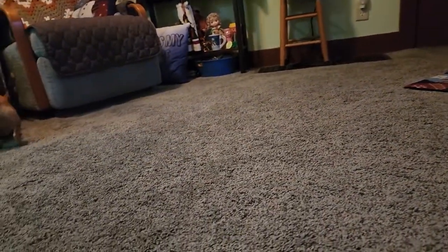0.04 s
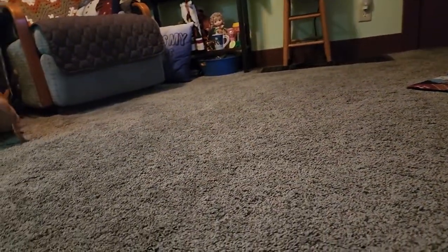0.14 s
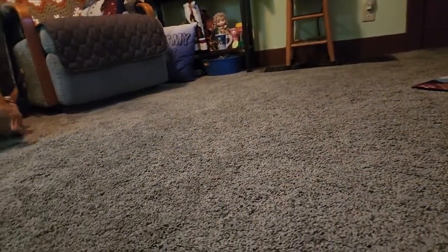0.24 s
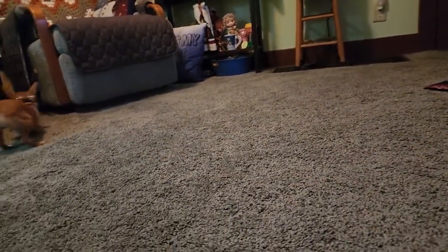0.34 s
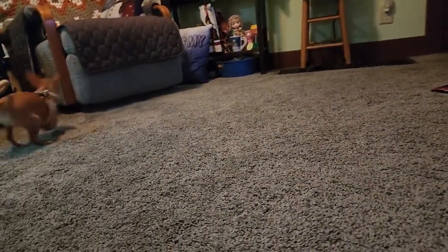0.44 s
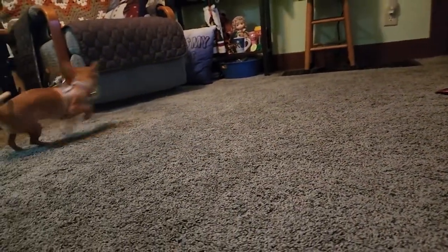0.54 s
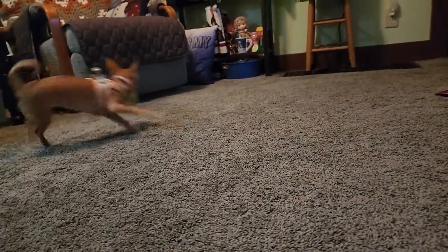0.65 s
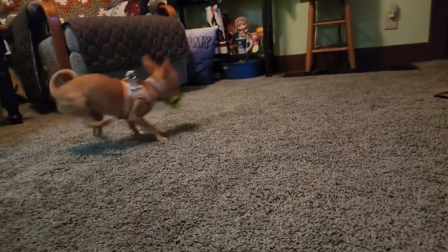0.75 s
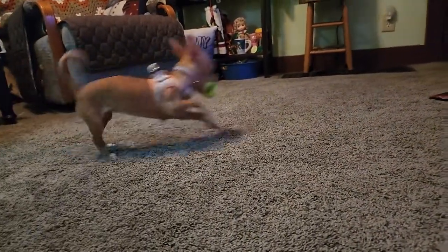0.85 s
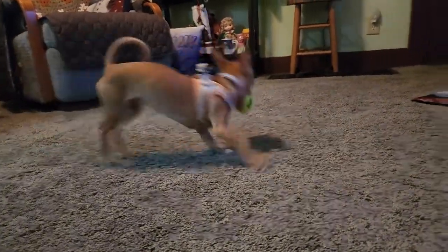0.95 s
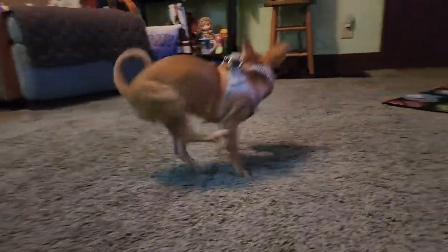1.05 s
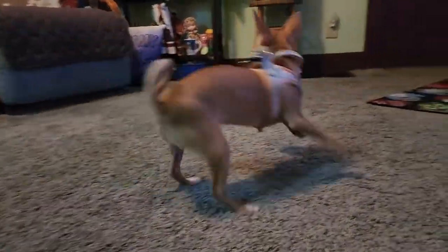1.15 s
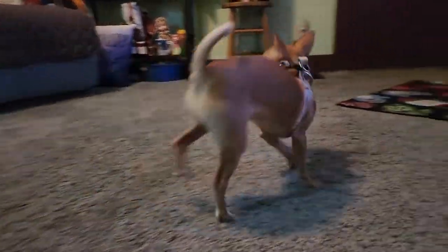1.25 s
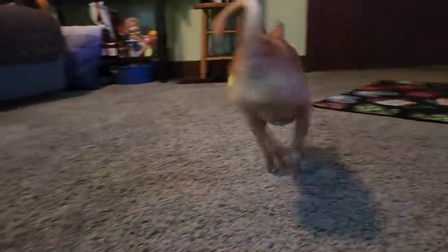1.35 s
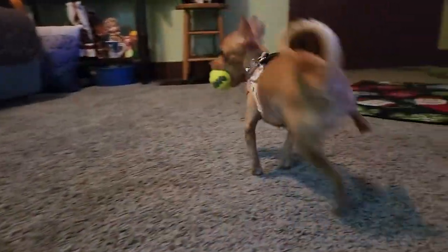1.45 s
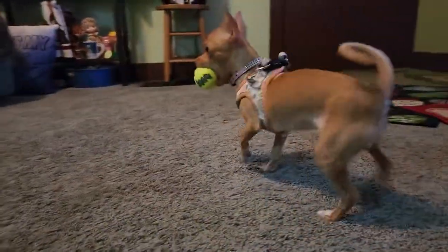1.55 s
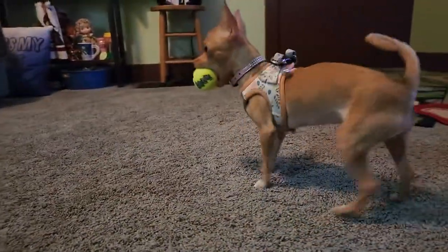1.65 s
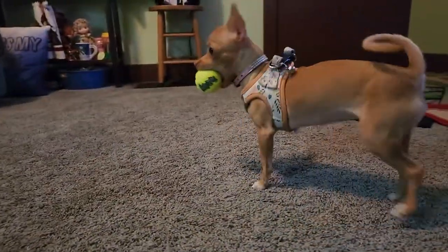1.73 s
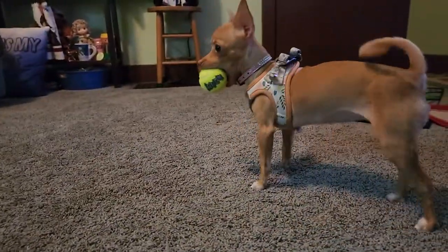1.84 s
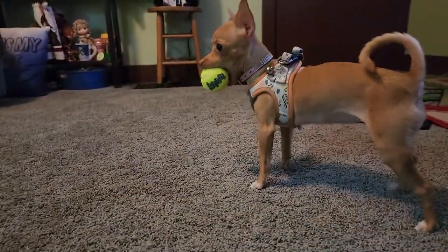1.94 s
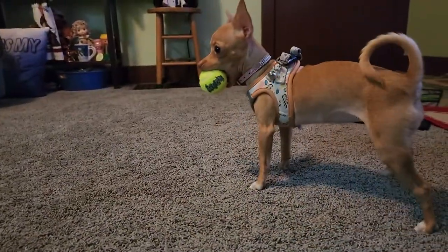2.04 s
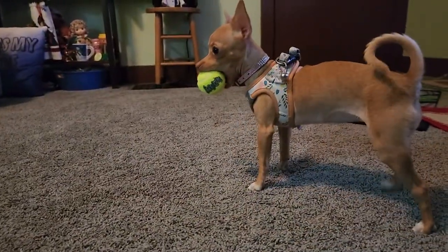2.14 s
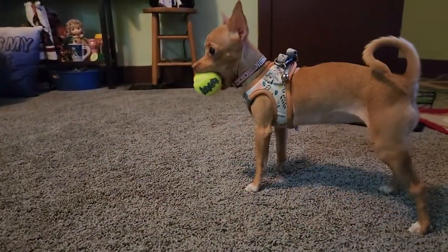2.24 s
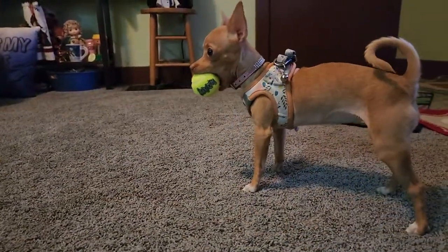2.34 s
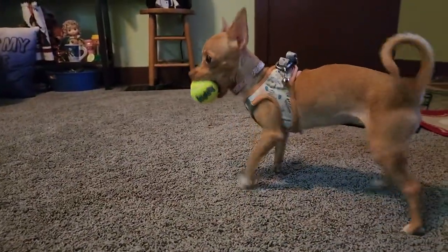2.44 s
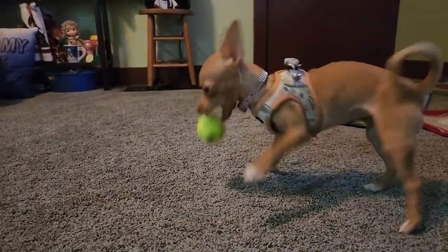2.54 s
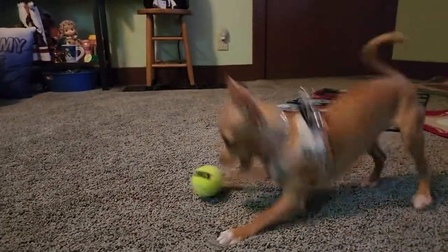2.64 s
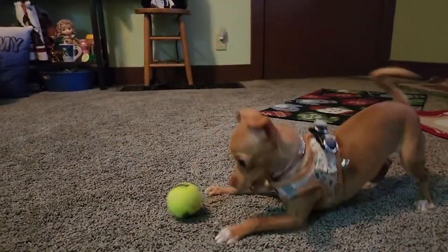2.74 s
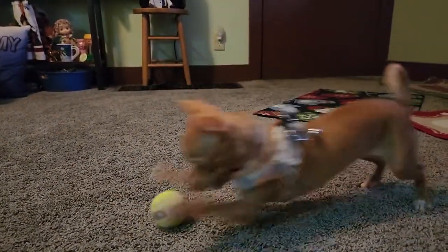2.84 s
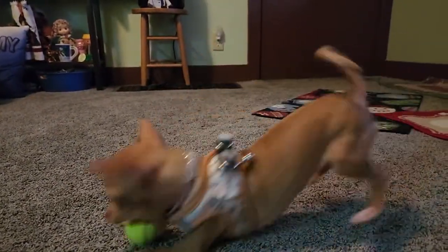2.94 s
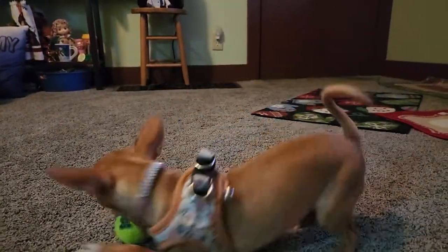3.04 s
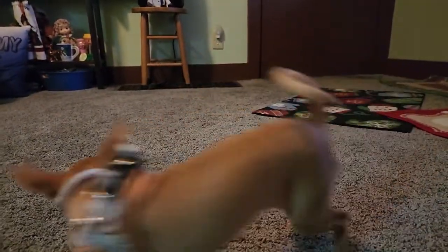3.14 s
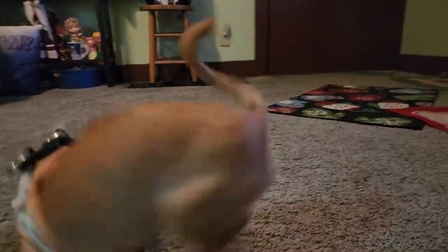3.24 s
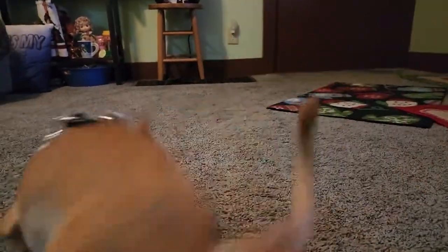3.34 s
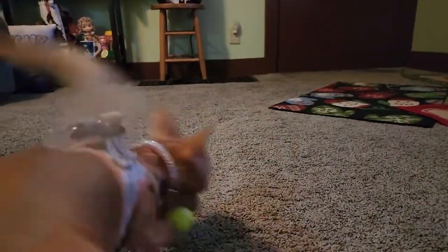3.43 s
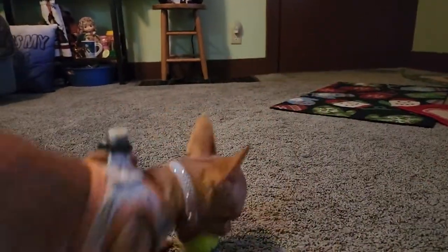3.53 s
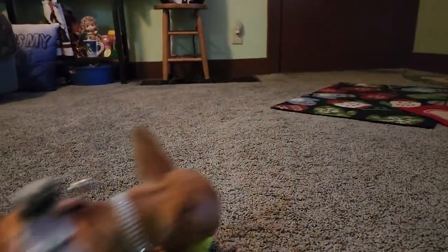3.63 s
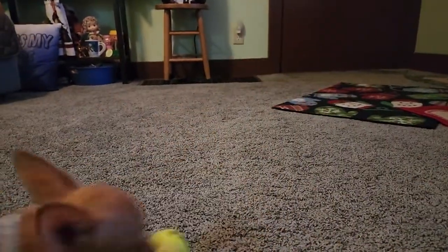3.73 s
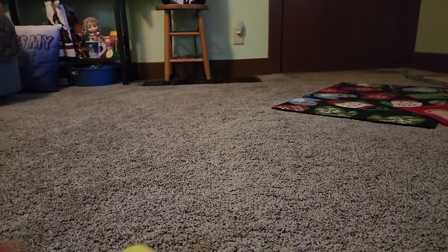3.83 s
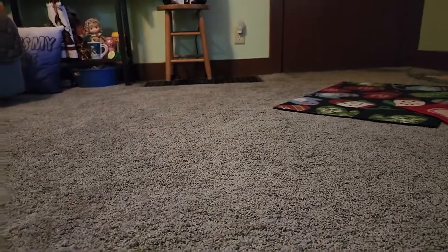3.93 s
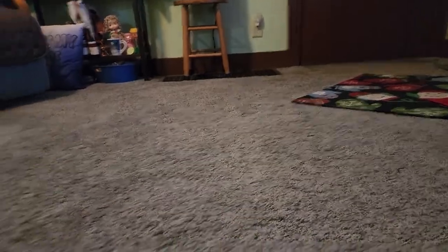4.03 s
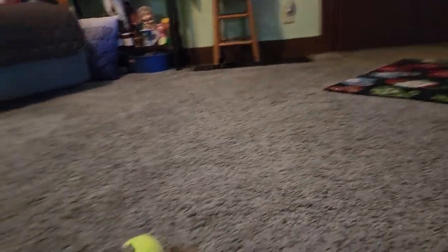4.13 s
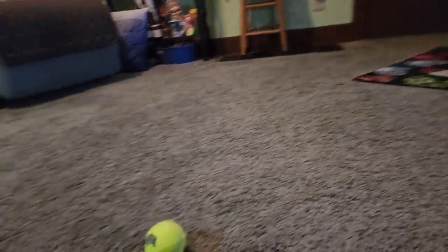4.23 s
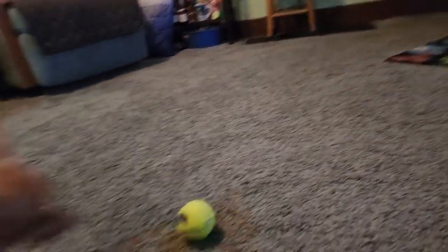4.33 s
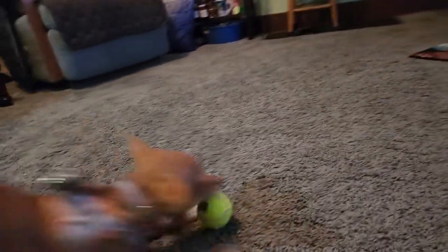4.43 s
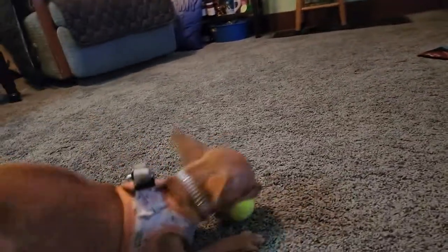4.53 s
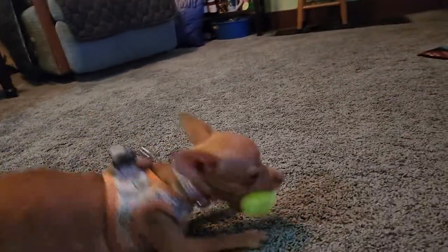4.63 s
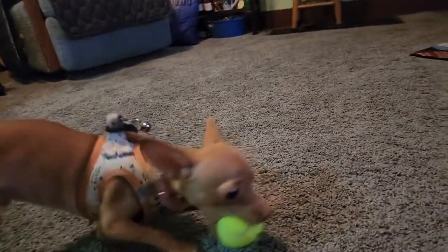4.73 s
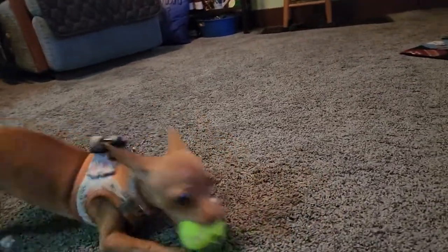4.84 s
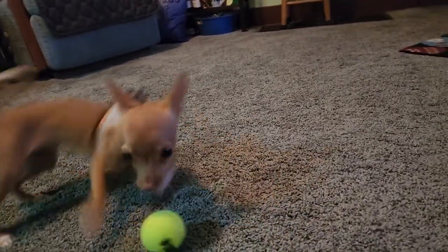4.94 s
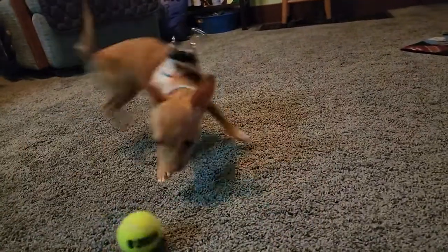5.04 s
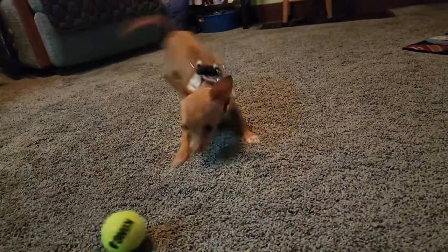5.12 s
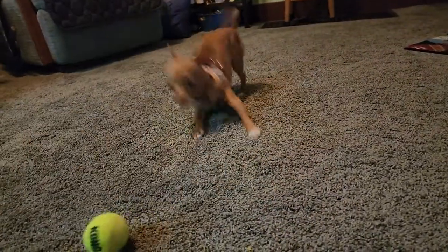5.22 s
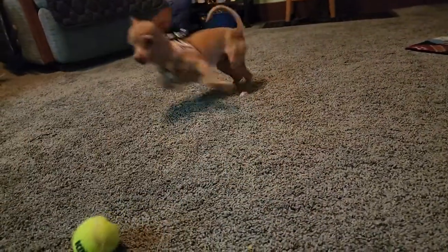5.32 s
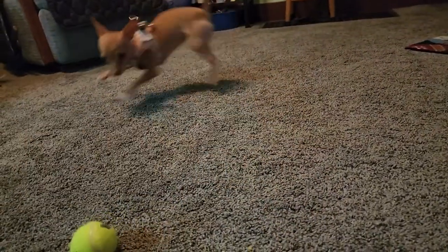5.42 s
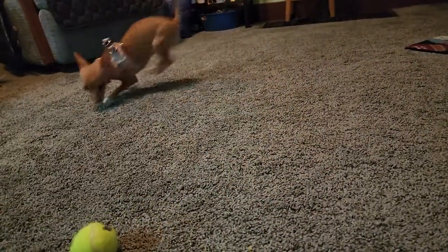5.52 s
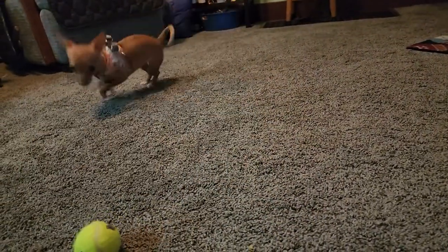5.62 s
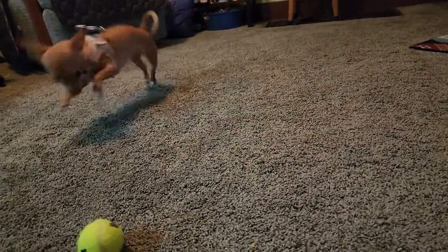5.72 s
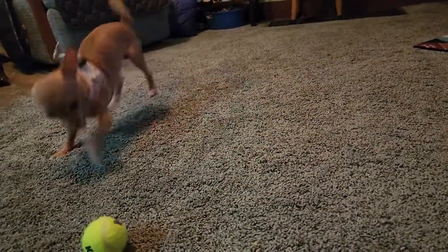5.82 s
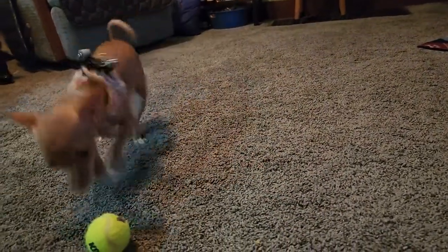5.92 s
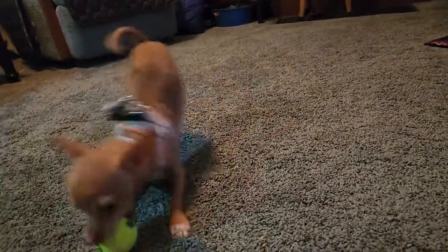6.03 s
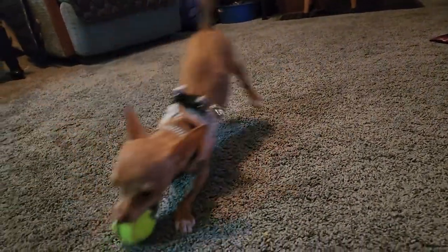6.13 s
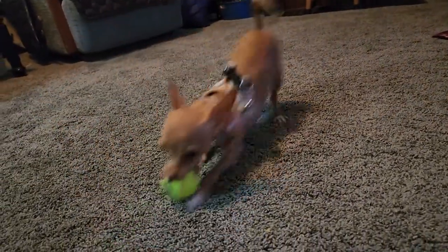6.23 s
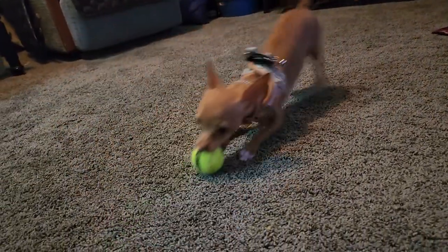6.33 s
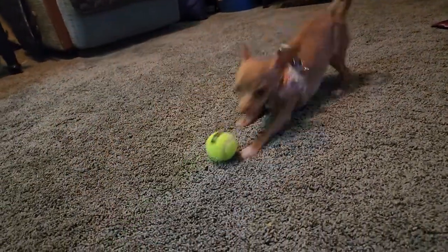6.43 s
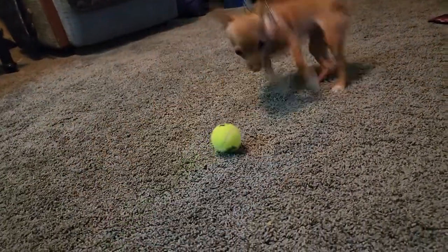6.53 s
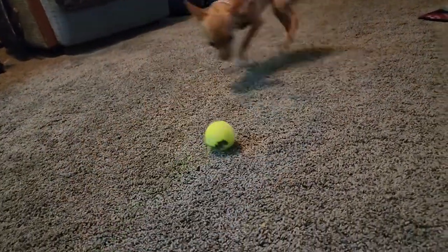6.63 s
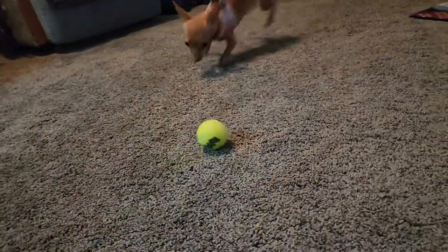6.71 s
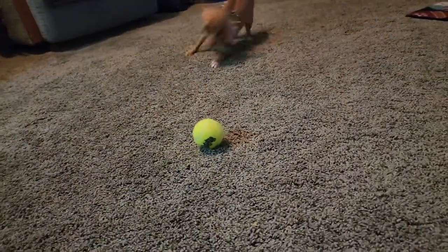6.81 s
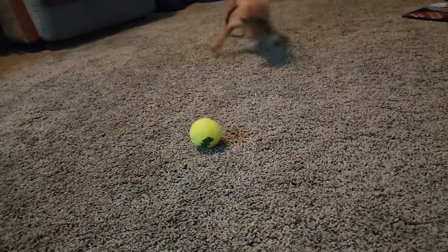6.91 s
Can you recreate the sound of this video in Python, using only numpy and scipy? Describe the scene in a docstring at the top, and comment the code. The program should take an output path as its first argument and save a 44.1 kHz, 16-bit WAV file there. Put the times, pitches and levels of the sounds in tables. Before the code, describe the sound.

Quick bright tinkles and thin metal clicks follow a running puppy, pausing briefly around two seconds. Then the jingling grows louder and denser in jerky bursts, mixed with low padded thuds, fuzzy paw and claw scrapes and a brief hollow rub of a ball on carpet. A faint high whistle glides early and midway. Close, dry indoor sound, very short reverberation.

```python
"""Small bells and metal tags on a puppy's harness ring and clack: resonant modes excited by impacts.
The links chatter and pellets roll in the bells, as dense trains of small contacts filtered by resonances.
On the carpet of a quiet room, paws and ball thud (damped oscillation), pads and claws scuff, and a rubbed
hollow ball hums (friction-driven modes). A thin whistle glides now and then; the house rumbles faintly.
A small stereo microphone stands close by: channels differ in level, by a short lag and in coherence."""
import sys
import numpy as np
from scipy import signal
from scipy.fft import rfft, irfft, next_fast_len
from scipy.io import wavfile
from scipy.ndimage import uniform_filter1d

SR = 44100
rng = np.random.default_rng(int(sys.argv[2]) if len(sys.argv) > 2 else 0)


def waveform_to_disk(signal):
    """Save audio, clipped to [-1, 1], as 16-bit WAV at the path in sys.argv[1]."""
    frames = np.transpose(np.atleast_2d(signal))
    scaled = np.clip(frames, -1, 1) * 32767
    samples = np.round(scaled).astype(np.int16)
    wavfile.write(sys.argv[1], SR, samples)


N = 307377

# Impacts of metal on metal (t/s, nominal clack level/dB, low bell level/dB, high bell level/dB)
IMPACTS = [(0.021, -36, -39.5, -56), (0.142, -66, -74, -70), (0.273, -58, -45.5, -58),
           (0.4, -49, -36.5, -78), (0.4816, -34.5, -36, -66), (0.535, -42, -50, -62),
           (0.603, -40, -42, -61), (0.663, -48, -41, -70), (0.8495, -25, -22.5, -52),
           (0.9838, -28, -31, -41), (1.063, -41, -35, -68), (1.276, -36, -29, -59), (1.385, -38, -57, -41),
           (1.5288, -39, -30.5, -65), (1.575, -35.5, -40, -58), (1.71, -49, -27, -41),
           (1.8387, -30.5, -70, -62), (1.9159, -42, -32, -44), (2.156, -53, -49, -70),
           (2.1828, -67, -42, -46), (2.289, -42.5, -52, -63), (2.338, -44, -71, -70),
           (2.389, -71, -54, -43.5), (2.709, -26.5, -37, -45), (2.716, -18, -32, -38),
           (2.802, -5.5, -53, -36), (2.817, -24, -48, -34), (3.026, -44, -40, -65), (3.044, -24, -34, -63),
           (3.107, -48, -36.5, -71), (3.1871, -30, -26.5, -35.5), (3.3747, -36, -35.5, -68),
           (3.475, -33.5, -72, -51), (3.5013, -25.5, -65, -48), (3.5597, -11, -35, -22),
           (3.686, -25, -26, -55), (3.698, -19.5, -59, -51), (3.8187, -21, -30, -35.5),
           (3.868, -28.5, -51, -24.5), (3.9398, -28, -40, -39), (3.9755, -35, -35, -34),
           (4.0154, -29, -38, -37), (4.041, -15.5, -10, -53), (4.0644, -9.5, -50, -52),
           (4.15, -26.5, -26, -56), (4.236, -33, -34, -62), (4.3444, -19.5, -53, -34),
           (4.572, -21.5, -30, -53), (4.5939, -13.5, -22.5, -23), (4.698, -33.5, -30, -66),
           (4.785, -12, -24.5, -55), (4.872, -29.5, -49, -54), (4.922, -26, -55, -50),
           (4.94, -31, -31, -36), (5.01, -48, -30, -40), (5.252, -24, -28, -35), (5.379, -59, -30.5, -71),
           (5.457, -35, -46, -58), (5.6304, -12, -24, -54), (5.658, -21, -27.5, -46),
           (5.68, -21.5, -26, -53), (5.8676, -58, -27, -37.5), (5.9525, -15.5, -43, -27),
           (5.985, -15.5, -22, -31), (5.998, -20.5, -25, -29), (6.118, -19, -34, -32),
           (6.1443, -8.5, -20.5, -22), (6.159, -28, -49, -38), (6.213, -28, -30.5, -44),
           (6.2577, -29.5, -26.5, -33), (6.273, -42, -26, -30), (6.294, -53, -23, -61),
           (6.332, -31.5, -54, -72), (6.4645, -28, -41, -58), (6.576, -26, -23, -27),
           (6.6594, -54, -32.5, -36), (6.704, -24, -22, -61), (6.781, -13.5, -47, -32),
           (6.8798, -9, -32, -50), (6.9426, -22.5, -46, -35.5)]
# Modes of the bell shells (f/Hz, level/dB, t60/s)
BELL_MODES = [(4275, -9, .045), (4335, 0, .075), (4375, -1, .075), (4425, -10, .045), (10100, -3, .04),
              (10180, -1, .06), (10740, -9, .035), (10840, -8, .035)]
# Strikes on a lower bell (t/s, nominal level/dB), and its modes (f/Hz, level/dB, t60/s)
LOW_BELL_STRIKES = [(1.43, -61.5), (1.5339, -53), (1.8452, -47), (3.0899, -60), (3.7199, -46),
                    (4.3523, -39), (4.7027, -40.5), (5.2594, -50)]
LOW_BELL_MODES = [(3537, 0.5, 0.094), (2046, -8.5, 0.069)]
# Strikes on the thinnest tag, which rings out (t/s, nominal level/dB)
THIN_TAG_STRIKES = [(2.7157, -50), (3.5039, -44), (3.6301, -37), (3.9399, -30), (4.0412, -29),
                    (4.0981, -44), (5.6301, -46), (5.9863, -46), (6.1429, -39), (6.7032, -42),
                    (6.8793, -35)]
# Strength of the tags' short modes (f/Hz, level/dB)
TAG_SPECTRUM = [(3500, -14), (4000, -23), (5500, 7.5), (7000, -2), (9000, -16.5), (12000, -12.5),
                (15000, -11.5), (16800, -40)]
# Modes the tags keep from blow to blow (f/Hz, mean level relative to the clack/dB, t60/s)
TAG_MODES = [(5440, -12.5, 0.028), (7250, -21.5, 0.023), (8230, -22.5, 0.017), (9800, -20.5, 0.033),
             (12360, -24, 0.019)]
# Bouts of harness shaking (t/s, hold/s, link rattle level/dB, pellet rolling drive/dB)
SHAKING_BOUTS = [(0, 0.32, -70, -58), (.4, 0.18, -56.5, -42.5), (.8, 0.12, -44.5, -42),
                 (.98, 0.13, -47.5, -33.5), (1.17, 0.11, -49.5, -44.5), (1.27, 0.056, -46, -29.5),
                 (1.52, 0.14, -53.5, -47.5), (1.71, 0.045, -48.5, -42), (1.84, 0.17, -54, -42),
                 (2.6, 0.1, -55, -61), (2.71, 0.21, -47, -35.5), (3.03, 0.082, -49, -62),
                 (3.19, 0.1, -47.5, -76), (3.48, 0.21, -45, -34), (3.68, 0.13, -49, -39),
                 (3.82, 0.19, -50.5, -43), (4.04, 0.25, -53.5, -35), (4.23, 0.22, -54, -42.5),
                 (4.57, 0.03, -34.5, -35), (4.69, 0.18, -43, -58), (4.86, 0.17, -45, -39),
                 (5.1, 0.15, -53.5, -57), (5.24, 0.09, -43, -38.5), (5.45, 0.071, -49, -39.5),
                 (5.63, 0.16, -46, -34.5), (5.87, 0.22, -46, -37), (6.12, 0.15, -48, -58),
                 (6.25, 0.34, -61.5, -57), (6.46, 0.17, -51, -47), (6.66, 0.12, -50.5, -33),
                 (6.78, 0.17, -45, -34)]
# Relative spectrum of the chattering links (f/Hz, level per hertz/dB)
LINK_SPECTRUM = [(2500, -20), (3400, -17), (4000, -3.5), (5400, 0.5), (6500, -7.5), (9000, -16),
                 (13600, -17), (16000, -26.5)]
# Paws and ball on the floor (t/s, nominal peak level/dB, f/Hz)
FLOOR_BLOWS = [(0.932, -34.5, 109), (1.28, -29.5, 154.8), (2.752, -20.5, 120), (2.788, -20.5, 84.5),
               (2.859, -31.5, 106), (3.014, -32.5, 92), (3.124, -25.5, 130), (3.242, -29.5, 145.6),
               (3.298, -32.5, 116), (3.48, -27.5, 99), (4.361, -35.5, 96.7), (4.56, -17.5, 103.4),
               (4.956, -32.5, 148.4), (5.271, -37, 102), (5.626, -37.5, 113.3), (5.92, -34, 185),
               (5.967, -27.5, 169.2), (6.094, -29.5, 164.6), (6.281, -33.5, 71.6)]
# Rubs of the hollow ball on the carpet (t/s, hold/s, low, middle and high mode level/dB)
BALL_RUBS = [(4.6, .004, -90, -54, -82), (4.35, 0.038, -58, -78, -62), (4.7, 0.039, -75, -50, -59),
             (4.86, 0.23, -58.5, -78, -73), (5.27, 0.066, -74, -43, -70)]
# Modes of the ball's shell (f/Hz, t60/s, index among the level columns of BALL_RUBS)
BALL_MODES = [(530, .06, 0), (880, .02, 1), (2050, .05, 2)]
# Paws scuffing the carpet (t/s, hold/s, dragging pad level/dB, claw level/dB)
CARPET_SCUFFS = [(.95, 0.028, -76, -62), (1.32, 0.067, -67, -65), (1.52, 0.06, -72, -66),
                 (2.6, 0.055, -77, -65.5), (2.74, .1, -59, -61.5), (3.0, 0.054, -57.5, -63),
                 (3.18, 0.19, -54, -63), (3.49, 0.16, -59, -63), (3.67, 0.22, -57, -59),
                 (3.86, 0.06, -56, -56), (4.04, 0.15, -54, -52.5), (4.34, 0.013, -56.5, -56.5),
                 (4.56, 0.027, -47, -53.5), (4.7, 0.093, -54.5, -50), (4.84, 0.18, -48, -48),
                 (5.26, 0.025, -47, -51), (5.62, 0.064, -62, -63), (5.75, 0.019, -57, -98),
                 (5.95, 0.023, -69, -66), (6.11, 0.053, -57.5, -61.5), (6.33, 0.082, -53, -62),
                 (6.55, 0.06, -54, -59), (6.72, 0.17, -101, -69.5), (6.86, 0.1, -54.5, -61)]
# Relative spectra of dragging pads and of claws in the pile (f/Hz, level per hertz/dB)
PAD_SPECTRUM = [(88, -46), (150, 5.5), (400, -13), (530, -10), (650, -11), (900, -10), (1200, -13),
                (1700, -32)]
CLAW_SPECTRUM = [(900, -12), (1300, -0.5), (2100, 4), (2600, 1.5), (3500, 0), (4500, 0)]
# Whistled arches in pitch (t/s, length/s, moment of the crest/s, crest f/Hz, nominal level/dB)
WHISTLE_ARCHES = [(1.21, .16, 1.44, 7750, -59), (1.48, .58, 1.81, 8720, -63), (4.35, .22, 4.6, 8560, -60)]
# Relative spectrum of the house rumble (f/Hz, level per hertz/dB)
RUMBLE_SPECTRUM = [(20, -25), (46, -3), (81, -4.5), (114, -1.5), (150, -14.5), (240, -17.5), (383, -34.5),
                   (2330, -48.5), (3200, -47.5), (4160, -92)]
# Coherence of the two channels in a diffuse sound (f/Hz, coherence from 0 to 1)
COHERENCE = [(60, 1), (250, 1), (600, 0.53), (1500, 0.25), (5000, 0.013)]

RIGHT_LAG_S = .00026
MICROPHONES = ((0, 0, 1), (1, RIGHT_LAG_S, -1))   # (channel, lag/s, sign of the pan)
LOW_MODES_PAN_DB, HIGH_MODES_PAN_DB, CLACK_PAN_SPREAD_DB = -9.5, 1.5, 6.5   # positive: left louder
ROLL_AFTER_JOLT_DB, ROLL_T60_S = -4.5, 0.15   # a jolt sets the pellets rolling, they settle
CLATTER_AFTER_CLACK_DB, CLATTER_T60_S = -14.5, 0.14
THIN_TAG_HZ, THIN_TAG_T60_S = 15255, .1
SHAKE_ATTACK_S, SHAKE_T60_S, HARNESS_REST_DB = 0.016, 0.32, -72
SCUFF_ATTACK_S, SCUFF_T60_S = 0.011, 0.55
CARPET_REST_DB = -80.5   # faint shuffling throughout
CLAWS_UNDER_RATTLE_DB = -25.5   # claws stir with the harness
# The pitch lies ARCH_SAG_HZ under the crest at a distance of ARCH_SPAN_S from it
ARCH_SAG_HZ, ARCH_SPAN_S, ARCH_POWER = 1500, .3, 2.5
ROOM_T60_S, ROOM_DB = 0.145, -12
WALL_LOSS_HZ = 38000   # here the decay rate is half as much again as at low frequency
RUMBLE_DB = -48.5
CUTOFF_HZ = 17000


def bells(rolling):
    """Modal excitation: jolts strike the shells, and pellets tick along their walls in between."""
    s, _, low_db, high_db = np.transpose(IMPACTS)
    luck = rng.normal(0, 1, (len(s), len(BELL_MODES)))
    rolling = rolling + settling(s, low_db + ROLL_AFTER_JOLT_DB, ROLL_T60_S)[0]
    out = low_bell() + thin_tag(rolling)
    for k, (hz, db, t60) in enumerate(BELL_MODES):
        upper = hz > 6000
        pan_db = HIGH_MODES_PAN_DB if upper else LOW_MODES_PAN_DB
        jolt_db = (high_db if upper else low_db) - 3.5 + 3 * luck[:, k]
        jolts = strike(s, amp(jolt_db), pan_db + 5.7 * luck[:, k - 1])
        ticks = rolling * amp(-38 if upper else -32) * grains(170, spread_db=5)
        ticks = ticks * flicker(7.3, depth_db=5.8 if upper else 1.0)
        ticks = late_right(ticks) * amp([[pan_db / 2], [-pan_db / 2]])
        out = out + amp(db) * swell_ring(jolts + ticks, hz, t60, .015 if upper else .028)
    return out


def low_bell():
    """Modal excitation of a lower bell by a strike and the dying ticks of its pellet."""
    s, db = np.transpose(LOW_BELL_STRIKES)
    ticks = amp(-23.5) * settling(s, db, 0.2) * grains(150, spread_db=2.5)
    pellet = strike(s, amp(db - 3), 0) + ticks
    return sum(amp(mode_db) * swell_ring(pellet, hz, t60, 0.0033) for hz, mode_db, t60 in LOW_BELL_MODES)


def thin_tag(rolling):
    """A single lightly damped mode, struck and also driven by fine ticks that follow the rolling."""
    s, db = np.transpose(THIN_TAG_STRIKES)
    ticks = amp(-64.5) * rolling * grains(250, spread_db=3)
    return swell_ring(strike(s, amp(db), 0) + ticks, THIN_TAG_HZ, THIN_TAG_T60_S, .01)


def tags():
    """Superposed damped modes: each bouncing contact excites a dense new set, plus a few kept modes."""
    out, t = np.zeros((2, N + SR)), np.arange(SR // 60) / SR
    luck = rng.random((len(IMPACTS), 4, 60))   # 60 short modes for each clack
    pans = rng.normal(0, CLACK_PAN_SPREAD_DB, len(IMPACTS))
    for (s, db, *_), (where, size, life, after), pan_db in zip(IMPACTS, luck, pans):
        hz = 3500 + 13300 * where[:, None] ** 1.3
        since = np.maximum(t - 0.0034 * after[:, None] ** 2.455, 0)   # bounces delay some modes
        t60 = .003 + .012 * life[:, None] ** 3
        modes = amp(at_hz(TAG_SPECTRUM, hz) + 6.7 * size[:, None] - 60 * since / t60)
        clack = amp(db - 15.5) * np.sum(modes * np.sin(2 * np.pi * hz * since), axis=0)
        for side, lag, sign in MICROPHONES:
            i = round((s + lag) * SR)
            out[side, i:i + len(t)] += clack * amp(sign * pan_db / 2)
    s, db, *_ = np.transpose(IMPACTS)
    chances_db = rng.normal(0, 5, (len(TAG_MODES), len(s)))
    for (hz, under_db, t60), chance_db in zip(TAG_MODES, chances_db):
        out[:, :N] += ring(strike(s, amp(db + under_db + chance_db), pans), hz, t60)
    high_pass = signal.butter(8, 3500, "high", fs=SR, output="sos")
    return signal.sosfilt(high_pass, out[:, :N])


def rattle(shaking):
    """Repeated contact: links chatter while shaken, and clatter briefly after each clack."""
    s, clack_db, *_ = np.transpose(IMPACTS)
    after = settling(s, clack_db + CLATTER_AFTER_CLACK_DB, CLATTER_T60_S)
    links = patter(3720, 15430, 3200, cycles=60, patchy_db=4.0) * flicker(30, depth_db=3)
    return (shaking + after) * coloured(links, LINK_SPECTRUM)


def thuds():
    """Damped oscillation: a soft push on the padded floor swings, and the boards rumble out."""
    out, t = np.zeros(N + SR), np.arange(SR // 2) / SR
    boards = signal.butter(3, [70, 260], "band", fs=SR, output="sos")
    for s, db, hz in FLOOR_BLOWS:
        rumble = rms_one(signal.sosfilt(boards, rng.standard_normal(len(t))))
        swell = 1 - np.exp(-t / 0.0009)
        swing = amp(-60 * t / 0.3) * np.sin(2 * np.pi * hz * t)
        blow = swell * (swing + 0.38 * rumble * amp(-60 * t / 0.24))
        i = round(s * SR)
        out[i:i + len(t)] += amp(db - 2.0) * blow
    return out[:N]


def ball():
    """Friction-driven resonance: fibres catch unevenly and set the shell's modes humming."""
    rubbing = bouts(BALL_RUBS, SCUFF_ATTACK_S, 0.15, -120)
    hum = np.zeros(N)
    for hz, t60, k in BALL_MODES:
        hum += rubbing[k] * rms_one(ring(grains(400, spread_db=1.5), hz, t60))
    return late_right(hum)


def scuffs(shaking):
    """Stick-slip friction: pads drag and claws comb the pile, which catches unevenly."""
    dragging, clawing = bouts(CARPET_SCUFFS, SCUFF_ATTACK_S, SCUFF_T60_S, CARPET_REST_DB)
    clawing = clawing + shaking * amp(CLAWS_UNDER_RATTLE_DB)
    pads = coloured(patter(166.4, 1253, 1200, cycles=10.5, patchy_db=4.5), PAD_SPECTRUM)
    claws = coloured(patter(1214, 4010, 3200, cycles=26, patchy_db=4.5), CLAW_SPECTRUM)
    return flicker(14, depth_db=3.5) * (dragging * pads + clawing * claws)


def whistles():
    """Frequency modulation: a thin gliding tone with a slight waver, faded in and out."""
    out = np.zeros(N)
    waver = rms_one(uniform_filter1d(rng.standard_normal(N), 300))
    unsteady = flicker(8, depth_db=1.5)
    for s, length, crest_s, crest_hz, db in WHISTLE_ARCHES:
        i = np.arange(round(s * SR), round((s + length) * SR))
        hz = crest_hz - ARCH_SAG_HZ * (np.abs(i / SR - crest_s) / ARCH_SPAN_S) ** ARCH_POWER
        phase = 2 * np.pi * np.cumsum(hz + 45 * waver[i]) / SR
        fade = np.clip(np.minimum(i / SR - s, s + length - i / SR) / .03, 0, 1)
        out[i] = fade * unsteady[i] * amp(db) * np.sin(phase)
    return out


def room(x):
    """Reverberation: twelve feedback delays a side, duller on every round, smeared by furniture."""
    size = next_fast_len(N + SR)
    hz = np.fft.rfftfreq(size, 1 / SR)
    out = np.zeros((2, len(hz)), complex)
    for k, lag in enumerate(rng.uniform(0.0065, 0.041, 24)):
        loss_db = -60 * lag / ROOM_T60_S * (1 + (hz / WALL_LOSS_HZ) ** 2 / 2)
        loop = amp(loss_db) * np.exp(-2j * np.pi * hz * lag)
        out[k % 2] += loop / (1 - loop) * (-1) ** (k // 2)
    for lag in (.0013, .0031, .0047):   # all-pass filters smear the echoes
        delay = np.exp(-2j * np.pi * hz * lag)
        out *= (delay - .6) / (1 - .6 * delay)
    return amp(ROOM_DB) * irfft(out * rfft(x, size), size)[:, :N]


def house_rumble():
    """Filtered noise: a steady low rumble of the house."""
    return amp(RUMBLE_DB) * coloured(rng.standard_normal((2, N)), RUMBLE_SPECTRUM)


def ring(clicks, hz, t60):
    """Impulse response of a damped resonator: a unit click starts a sine of height 1."""
    r, w = amp(-60 / (t60 * SR)), 2 * np.pi * hz / SR
    return signal.lfilter([0, np.sin(w)], [1, -2 * r * np.cos(w), r * r], clicks + 1e-18)


def swell_ring(clicks, hz, t60, swell_t60):
    """Two resonators in cascade: the ring builds up before it dies away."""
    return ring(ring(clicks, hz, swell_t60), hz, t60) * 2 * np.log(1000) / (swell_t60 * SR)


def strike(times, gains, pan_db):
    """Level and time differences between channels: clicks, a little late at the right."""
    out = np.zeros((2, N))
    for side, lag, sign in MICROPHONES:
        i = np.round((times + lag) * SR).astype(int)
        np.add.at(out[side], i, gains * amp(sign * pan_db / 2))
    return out


def late_right(x):
    """Time difference between channels: the same sound, a little late at the right."""
    return np.stack([x, np.roll(x, round(RIGHT_LAG_S * SR))])


def grains(per_s, spread_db):
    """A random impulse train: clicks of uneven size and sign; rms 1."""
    where, size, sign = rng.random((3, round(per_s * N / SR)))
    size_db = spread_db * np.minimum(-np.log(size + 1e-9), 4)
    out = np.zeros(N)
    out[(where * N).astype(int)] = amp(size_db) * np.sign(sign - .5)
    return rms_one(out)


def patter(low_hz, high_hz, per_s, cycles, patchy_db):
    """Random impulses through resonators at many pitches that come and go; rows mid, side; flat per Hz."""
    out, count = np.zeros((2, N)), 14
    contacts = np.stack([grains(per_s, spread_db=2.5), grains(per_s, spread_db=2.5)])
    dealt = rng.integers(0, count, (2, N))   # the pitch each contact excites
    for k, hz in enumerate(np.geomspace(low_hz, high_hz, count)):
        ringing = rms_one(ring(contacts * (dealt == k), hz, cycles / hz))
        out += np.sqrt(hz) * flicker(12.5, patchy_db) * ringing
    return out


def coloured(x, spectrum):
    """Spectral shaping and partial coherence of two channels (rows of x: mid, side); rms 1."""
    size = next_fast_len(N)
    hz = np.maximum(np.fft.rfftfreq(size, 1 / SR), 10)
    alike = np.clip(at_hz(COHERENCE, hz), 0, 1)
    mid, side = rfft(x, size) * amp(at_hz(spectrum, hz))
    pair = np.sqrt(1 + alike) * mid + np.sqrt(1 - alike) * side * [[1], [-1]]
    lag = np.exp(-2j * np.pi * hz * [[0], [RIGHT_LAG_S]])
    return rms_one(irfft(pair * lag, size)[:, :N])


def flicker(per_s, depth_db):
    """Random amplitude modulation: a gain that wanders about per_s times a second."""
    knots = amp(depth_db * rng.standard_normal(1000))
    return np.interp(np.arange(N) * (2 * per_s / SR), np.arange(len(knots)), knots)


def settling(times, level_db, t60):
    """Exponential decay: a gain that jumps at each moment and dies away."""
    jumps = strike(times, amp(level_db), 0)
    return signal.lfilter([1], [1, -amp(-60 / (t60 * SR))], jumps + 1e-18)


def bouts(rows, attack_s, t60, rest_db):
    """Envelopes, one per level column: each bout swells, holds and decays over a quiet rest."""
    out, t = np.full((len(rows[0]) - 2, N + SR), amp(rest_db)), np.arange(SR) / SR
    for s, hold, *db in rows:
        i = round(s * SR)
        shape = np.minimum(t / attack_s, 1) * amp(-60 * np.maximum(t - hold, 0) / t60)
        out[:, i:i + SR] += np.outer(amp(db), shape)
    return out[:, :N]


def at_hz(points, hz):
    """Interpolation of a table on a logarithmic frequency axis."""
    table_hz, value = np.array(points)[:, :2].T
    return np.interp(np.log(hz), np.log(table_hz), value)


def amp(db):
    """Amplitude ratio of a level in dB."""
    return np.exp(np.asarray(db) * (np.log(10) / 20))


def rms_one(x):
    """Normalization to an effective value (rms) of 1."""
    return x / np.sqrt(np.mean(x ** 2) + 1e-20)


def scene():
    """Superposition of direct sound, reverberation and background."""
    shaking, rolling = bouts(SHAKING_BOUTS, SHAKE_ATTACK_S, SHAKE_T60_S, HARNESS_REST_DB)
    ringing = bells(rolling) + tags() + rattle(shaking) + whistles()
    steps = thuds()
    direct = ringing + late_right(steps) + ball() + scuffs(shaking)
    reverberant = room(ringing.mean(axis=0) + amp(-27) * steps)
    return direct + reverberant + house_rumble()


def record(dry):
    """Low-pass filtering: a steep filter cuts the top."""
    return signal.sosfilt(signal.cheby2(16, 70, CUTOFF_HZ, fs=SR, output="sos"), dry)


dry = scene()
out = record(dry)
waveform_to_disk(out)
```